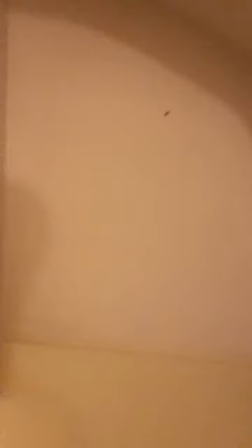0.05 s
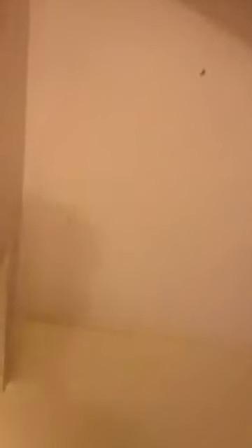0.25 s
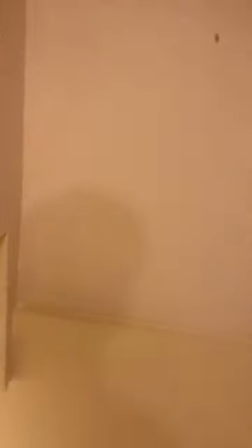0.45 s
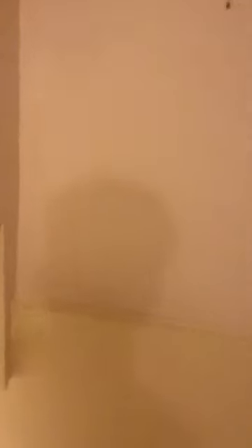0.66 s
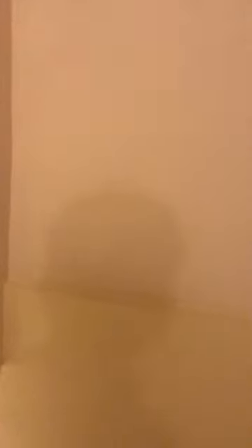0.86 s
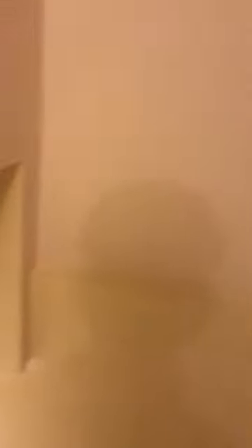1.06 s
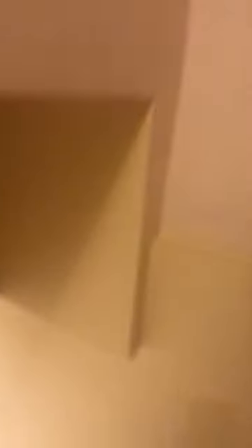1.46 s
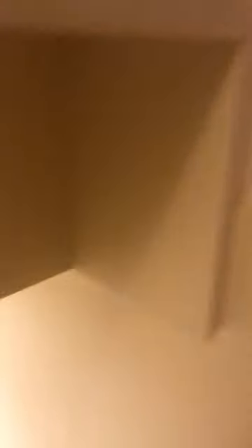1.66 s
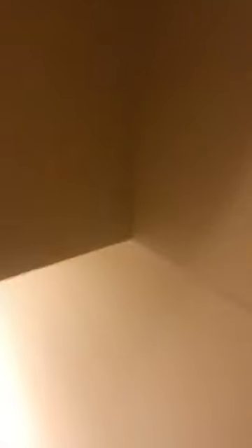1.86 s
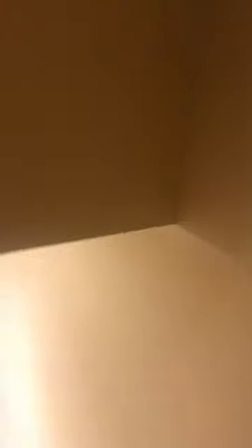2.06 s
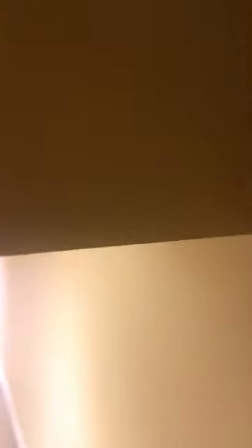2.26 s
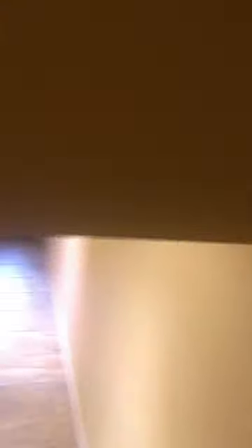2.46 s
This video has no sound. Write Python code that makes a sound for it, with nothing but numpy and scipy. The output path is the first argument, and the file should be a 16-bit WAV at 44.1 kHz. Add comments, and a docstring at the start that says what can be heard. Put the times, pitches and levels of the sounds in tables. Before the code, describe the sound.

Footsteps on wooden boards in a quiet room: four evenly paced, booming heel knocks, each trailed by light scuffs and ticks. A shoe squeaks faintly before the last, sharper step, over soft clothing rustle and low room noise.

```python
"""A small, quiet room with a wooden floor: four dull footsteps cross it at walking pace.
Each heel knocks on the boards and sets the floor booming; the sole then rolls down with a soft pat,
a scuff and a few ticks. The shoe squeaks faintly, and clothes rustle over the room's own noise."""
import sys
import numpy as np
from scipy import signal
from scipy.io import wavfile
from scipy.ndimage import uniform_filter1d

SR = 44100
rng = np.random.default_rng(int(sys.argv[2]) if len(sys.argv) > 2 else 0)


def waveform_to_disk(signal):
    """Save audio, clipped to [-1, 1], as 16-bit WAV at the path in sys.argv[1]."""
    frames = np.transpose(np.atleast_2d(signal))
    scaled = np.clip(frames, -1, 1) * 32767
    samples = np.round(scaled).astype(np.int16)
    wavfile.write(sys.argv[1], SR, samples)


N = 110250
TIME = np.arange(N) / SR
EDGES = 28 * 2 ** (np.arange(29) / 3)   # third-octave bands, Hz
CENTRES = np.sqrt(EDGES[1:] * EDGES[:-1])
ATTACK_S = 0.0025


def heels():
    """Each heel lands with a knock and a hard clack, rings the boards and sets the floor booming."""
    # Each row: start in seconds, knock in dB, treble tilt in dB per octave, pitch of the board underfoot
    # in Hz, its emphasis in dB, its ring in dB, boom in dB, boom t60 in seconds, clack gain in dB.
    steps = [(0.241, -37.5, -0.5, 318.6, 7, -26.5, -29.5, 0.55, -40.5),
             (0.841, -40, 0.46, 270, 2.5, -43, -23.5, 0.22, -74),
             (1.371, -39, 0.36, 189.5, 3.5, -29, -29.5, .44, -42),
             (1.981, -34, 0.0, 596.6, 5.5, -40, -32, 0.43, -29.5)]
    # Floor modes that every step rings. Each row: pitch in Hz, level in dB, t60 in seconds.
    floor_modes = [(89.6, -45, 0.6), (132.4, -50.5, 0.99), (185.5, -39, 0.31), (248.5, -43.5, 0.21),
                   (269.6, -44, 0.54), (314, -47.5, 0.33), (324.3, -42, 0.2), (387.2, -36.5, 0.23),
                   (586.5, -50, 0.65), (652.5, -46.5, 0.38), (749, -68, 0.71), (884, -50.5, 0.43),
                   (903, -58.5, 0.42)]
    # Low modes shoved by the body's weight. Each row: pitch in Hz, level in dB, t60 in seconds.
    shove_modes = [(41.8, -35, 0.31), (72, -36.5, 0.065)]
    floor_build_s, board_build_s, board_t60, scatter_db = 0.0072, 0.018, 0.19, 1.5
    boom_hz, boom_build_s, boom_lag_s, clack_lag_s = 54, 0.018, 0.008, 0.0037
    out, t = np.zeros(N), TIME[:SR]
    for start, knock_db, tilt_db, board_hz, emphasis_db, ring_db, boom_db, boom_t60, clack_db in steps:
        modes = [(hz, db + scatter_db * rng.standard_normal(), t60) for hz, db, t60 in floor_modes]
        floor = ring(modes + shove_modes, t) * np.minimum(t / floor_build_s, 1)
        board = ring([(board_hz, ring_db, board_t60)], t) * np.minimum(t / board_build_s, 1)
        boom = ring([(boom_hz, boom_db, boom_t60)], t) * (1 - np.exp(-t / boom_build_s))
        add(out, start, from_db(knock_db) * knock(t, board_hz, emphasis_db, tilt_db))
        add(out, start + clack_lag_s, from_db(clack_db) * clack(t))
        add(out, start, floor + board)
        add(out, start + boom_lag_s, boom)
    return out


def knock(t, board_hz, emphasis_db, tilt_db):
    """The heel's dull contact, coloured by the board underfoot, dies away in the room."""
    # The knock's spectrum. Each row: frequency in Hz, relative density in dB.
    spectrum = [(30, -21), (42, -10), (80, -9.5), (130, -3.5), (260, -2), (450, -3.5), (650, -1.5),
                (950, -4.5), (1400, -8), (2600, -10.5), (5000, -22), (8000, -33.5), (15000, -43)]
    # The room's tail. Each row: frequency in Hz, level against the first contact in dB.
    tail_levels = [(60, 16), (300, 1.5), (900, -0.5), (2500, -9.5), (8000, -3)]
    # The room's decay. Each row: frequency in Hz, t60 in seconds.
    room_t60 = [(50, 1), (150, 0.46), (400, 0.65), (900, .62), (2500, 1), (10000, 1)]
    build_cycles, board_width_oct, tilt_pivot_hz = 0.56, 0.26, 500
    hz = CENTRES[:, None]
    rise = np.minimum(t / (ATTACK_S + build_cycles / hz), 1)   # the bass builds more slowly
    tail = from_db(at_hz(tail_levels, hz)) * fade(t, at_hz(room_t60, hz))
    envelope = rise * np.hypot(fade(t, t60=0.18), tail)
    emphasis = emphasis_db * np.exp(-0.5 * (np.log2(CENTRES / board_hz) / board_width_oct) ** 2)
    tilt = tilt_db * np.maximum(np.log2(CENTRES / tilt_pivot_hz), 0)
    return burst(at_hz(spectrum, CENTRES) + emphasis + tilt, envelope)


def clack(t):
    """The heel's hard edge rings briefly and echoes off the near walls."""
    # The heel's modes. Each row: pitch in Hz, relative level in dB, t60 in seconds.
    heel_modes = [(598, -7.5, 0.065), (908, -1.5, 0.041), (1057, -7.5, 0.015), (1686, -15, 0.006),
                  (2450, -11.5, 0.021), (4060, -20, 0.014)]
    # The direct sound, then its echoes. Each row: delay in seconds, gain in dB.
    arrivals = [(0, 6), (.0085, -7.5), (.0205, -18), (.037, -11)]
    out = np.zeros(N)
    for delay, db in arrivals:
        add(out, delay, from_db(db) * ring(heel_modes, t))
    return out


def sole_pats():
    """The ball of the foot pats down with a soft, low thud."""
    # Each row: start in seconds, level in dB.
    pats = [(0.337, -48), (0.446, -56.5), (0.982, -45.5), (1.554, -51.5), (2.089, -46.5)]
    # The pat's spectrum. Each row: frequency in Hz, relative density in dB.
    spectrum = [(35, -22), (70, 4), (130, 11.5), (400, -10.5), (700, -2), (1500, -33), (5000, -27)]
    out, t = np.zeros(N), TIME[:SR // 3]
    envelope = np.minimum(t / ATTACK_S, 1) * fade(t, t60=0.23)
    for start, db in pats:
        add(out, start, from_db(db) * burst(at_hz(spectrum, CENTRES), envelope))
    return out


def ticks():
    """Sole and floor give small ticks, each with a short tail in the room."""
    # Each row: start in seconds, level in dB, brightness in Hz.
    events = [(.246, -37.5, 2150), (0.3435, -45.5, 10000), (0.623, -59, 1200), (0.82, -49, 1090),
              (.843, -42.5, 2580), (0.984, -48, 9000), (1.135, -51, 2200), (1.374, -53.5, 10100),
              (1.379, -47, 4000), (1.399, -48, 5000), (1.986, -42, 5400), (2.03, -43, 4500),
              (2.096, -44, 4000), (2.149, -55, 5540), (2.349, -52, 2710)]
    width_oct = 0.54
    out, t = np.zeros(N), TIME[:SR // 3]
    tail = from_db(-20) * fade(t, t60=0.55)
    envelope = np.hypot(fade(t, t60=0.018), tail)
    for start, db, hz in events:
        band_db = -10 * np.log10(1 + (np.log2(CENTRES / hz) / width_oct) ** 4)
        rolloff_db = -10 * np.log10(1 + (CENTRES / hz) ** 2)
        add(out, start, from_db(db) * burst(band_db + rolloff_db, envelope))
    return out


def sole_scuffs():
    """Friction swells and fades as the sole rolls down on the wood."""
    # Each row: peak time in seconds, level in dB, rise and fall in seconds.
    scuffs = [(0.35, -48, 0.024, 0.035), (0.431, -56, 0.02, 0.083), (.998, -53, 0.062, 0.099),
              (1.556, -55, 0.024, 0.04), (2.15, -47.5, 0.024, 0.038)]
    # The scuff's spectrum. Each row: frequency in Hz, relative density in dB.
    spectrum = [(200, -8), (500, -4), (900, 1), (1600, -5), (3000, -5), (4200, -4.5), (5200, -9.5),
                (9000, -15), (15000, -17.5)]
    friction = sum(from_db(db) * swell(peak, rise, fall) for peak, db, rise, fall in scuffs)
    return friction * coloured(spectrum, noise_bands(N))


def shoe_squeaks():
    """The shoe squeaks faintly: brief friction in one narrow resonance."""
    # Each row: peak time in seconds, level in dB, pitch in Hz, fall in seconds.
    squeaks = [(1.812, -67.5, 5640, 0.041), (1.869, -57, 2420, 0.028)]
    out = np.zeros(N)
    for peak, db, hz, fall in squeaks:
        tone = resonate(rng.standard_normal(N), hz, width_hz=300)
        out += from_db(db) * swell(peak, rise_s=0.005, fall_s=fall) * tone / tone.std()
    return out


def clothes():
    """Clothes stir with the walk: a dull rustle and a treble swish."""
    # Each row: time in seconds, rustle level in dB, swish level in dB.
    movement = [(0, -55.5, -65), (.1, -64.5, -64.5), (.21, -56, -63.5), (.42, -61, -60), (.57, -79, -85),
                (.66, -70, -71), (.75, -61, -66.5), (1.1, -62.5, -80), (1.2, -69.5, -66.5),
                (1.33, -71.5, -67.5), (1.72, -66, -77.5), (1.87, -60.5, -67), (1.961, -62, -71),
                (2.3, -58.5, -66.5), (2.5, -60.5, -64.5)]
    # The spectra of rustle and swish. Each row: frequency in Hz, relative density in dB.
    rustle_spectrum = [(120, -33), (250, -5.5), (380, 2.5), (650, -5), (1100, -4.5), (1600, -13),
                       (3500, -27), (15000, -55)]
    swish_spectrum = [(500, -31), (1500, 2), (3000, 6), (4300, 1), (5200, -2), (9000, -6.5), (15000, -14)]
    times, rustle_db, swish_db = np.transpose(movement)
    bands = noise_bands(N)
    rustle = from_db(np.interp(TIME, times, rustle_db)) * coloured(rustle_spectrum, bands)
    swish = from_db(np.interp(TIME, times, swish_db)) * coloured(swish_spectrum, bands)
    return rustle + swish


def room_tone():
    """The room's own steady, low noise."""
    # Each row: frequency in Hz, relative density in dB.
    spectrum = [(15, 7), (25, -8.5), (59, -2), (152, -16), (233, -16.5), (281, -26.5), (389, -28),
                (433, -16), (684, -23), (1140, -21), (1530, -31.5), (4500, -31.5), (15500, -40.5)]
    return from_db(-60.5) * coloured(spectrum, noise_bands(N))


def standing_waves(x):
    """A few resonances of the room colour the sound."""
    # Each row: frequency in Hz, width in Hz, gain in dB.
    room_modes = [(58.3, 5.5, -4), (344, 53, -16), (895, 38, -1)]
    return x + sum(from_db(db) * resonate(x, hz, width) for hz, width, db in room_modes)


def from_db(db):
    """Decibels to gain."""
    return 10 ** (np.asarray(db) / 20)


def at_hz(points, hz):
    """Read a table on a log-frequency axis."""
    freqs, values = np.transpose(points)
    return np.interp(np.log(hz), np.log(freqs), values)


def fade(t, t60):
    """Exponential decay, 60 dB down after t60 seconds."""
    return np.exp(-np.log(1000) * t / t60)


def swell(peak_s, rise_s, fall_s):
    """Exponential rise to a peak and fall from it."""
    return np.exp(-np.maximum((peak_s - TIME) / rise_s, (TIME - peak_s) / fall_s))


def add(out, start_s, sound):
    """Mix a sound in at a time."""
    i = int(start_s * SR)
    out[i:i + len(sound)] += sound[:N - i]


def ring(modes, t):
    """Struck modes, alternating in sign."""
    return sum((-1) ** k * from_db(db) * np.sin(2 * np.pi * hz * t) * fade(t, t60)
               for k, (hz, db, t60) in enumerate(modes))


def resonate(x, hz, width_hz):
    """Pass a sound through one resonance."""
    return signal.lfilter(*signal.iirpeak(hz, hz / width_hz, fs=SR), x)


def noise_bands(size):
    """Third-octave bands of noise, each of rms 1."""
    white = rng.standard_normal((2, size + SR // 4))
    filters = [signal.butter(2, pair, "band", fs=SR, output="sos") for pair in zip(EDGES, EDGES[1:])]
    bands = np.array([signal.sosfilt(sos, white[k % 2])[-size:] for k, sos in enumerate(filters)])
    return bands / bands.std(axis=1, keepdims=True)


def band_gains(density_db):
    """Band gains for a spectral density; total power 1."""
    gains = from_db(density_db) * np.sqrt(CENTRES)
    return gains / np.linalg.norm(gains)


def coloured(spectrum, bands):
    """Mix noise bands to a spectrum."""
    return band_gains(at_hz(spectrum, CENTRES)) @ bands


def burst(density_db, envelope):
    """Coloured noise under an envelope; each band is partly evened out and set to its share of energy."""
    even_cycles, even_share = 32, 0.23
    bands = noise_bands(envelope.shape[-1])
    windows = [int(even_cycles * SR / hz) + SR // 200 for hz in CENTRES]
    power = np.array([uniform_filter1d(band ** 2, size) for band, size in zip(bands, windows)])
    bands = bands * envelope / np.sqrt(power + 1e-9) ** even_share
    trim = np.sqrt(np.sum(envelope ** 2, axis=-1) / np.sum(bands ** 2, axis=-1))
    return (band_gains(density_db) * trim) @ bands


def scene():
    """Heels and quieter sounds at one microphone; standing waves colour only the quieter ones."""
    strikes = heels()
    quiet = sole_pats() + ticks() + sole_scuffs() + shoe_squeaks() + room_tone() + clothes()
    return (strikes + standing_waves(quiet))[None]


def record(dry):
    """The microphone loses the deepest bass; the top is cut steeply."""
    low_cut_hz, high_cut_hz = 25, 15750
    thinned = signal.sosfilt(signal.butter(4, low_cut_hz, "high", fs=SR, output="sos"), dry)
    return signal.sosfilt(signal.ellip(12, 0.1, 80, high_cut_hz, fs=SR, output="sos"), thinned)


dry = scene()
out = record(dry)
waveform_to_disk(out)
```